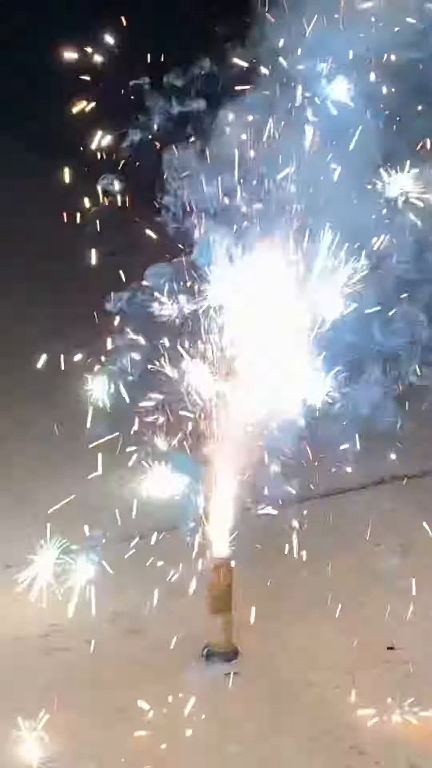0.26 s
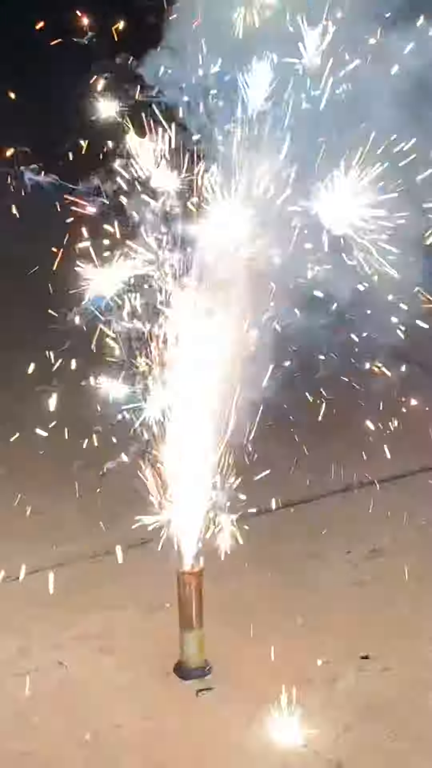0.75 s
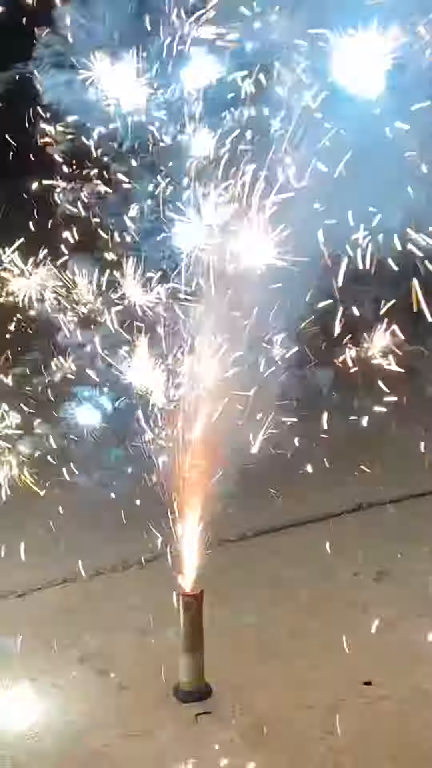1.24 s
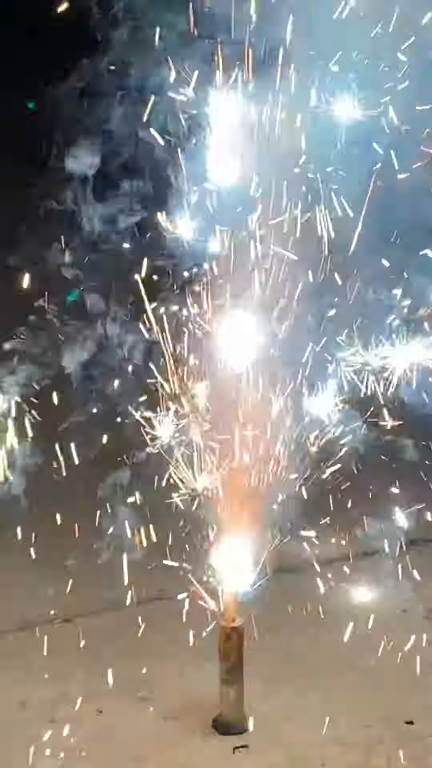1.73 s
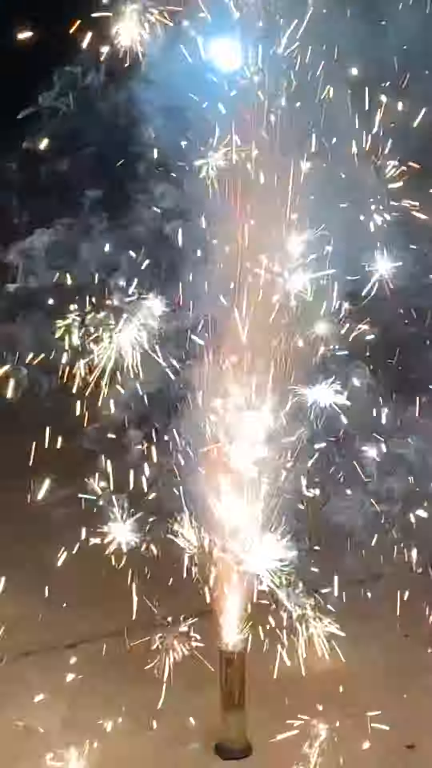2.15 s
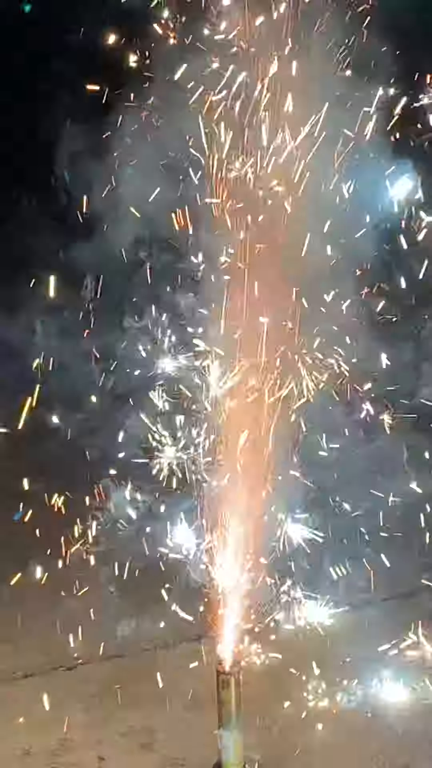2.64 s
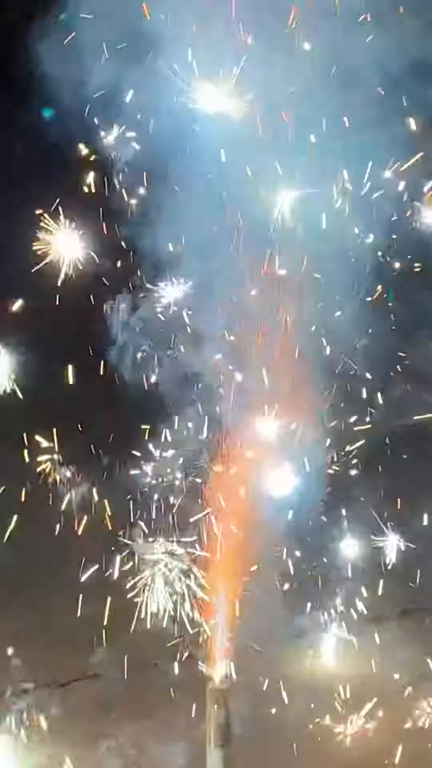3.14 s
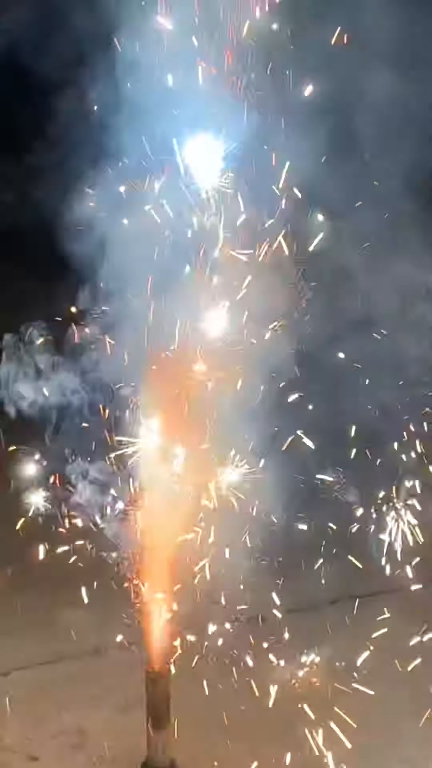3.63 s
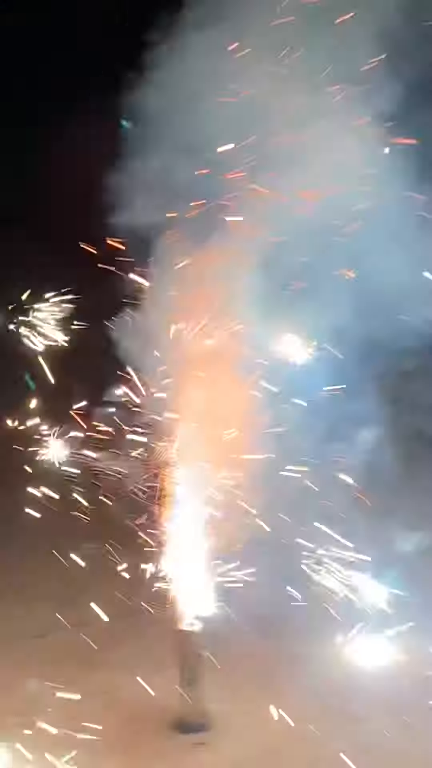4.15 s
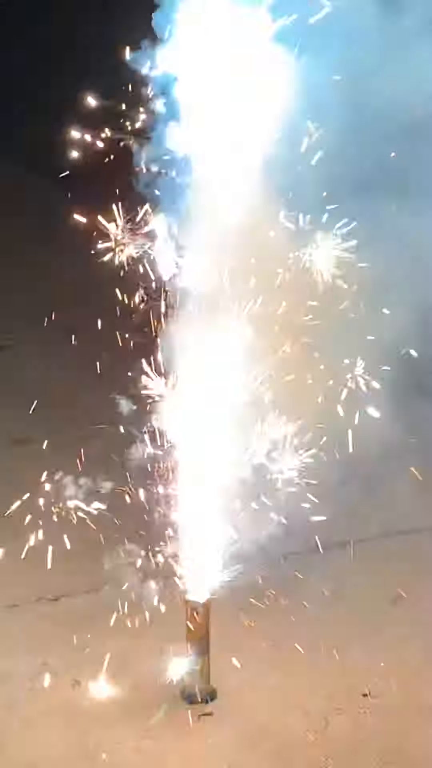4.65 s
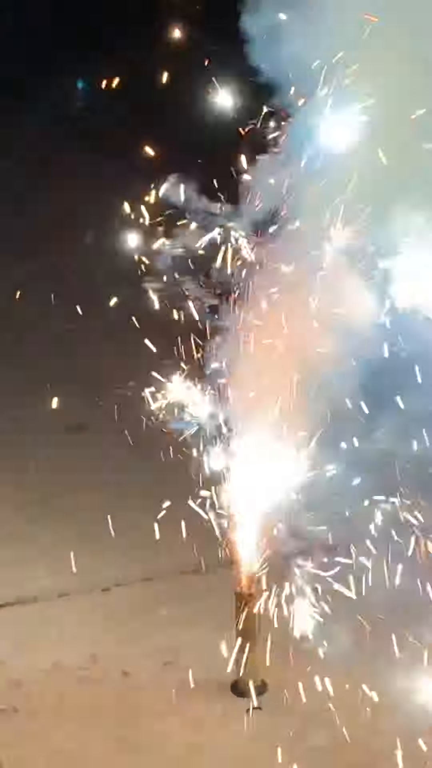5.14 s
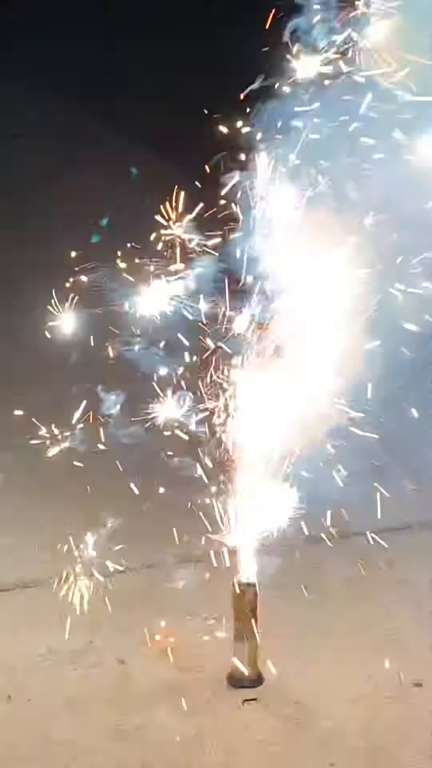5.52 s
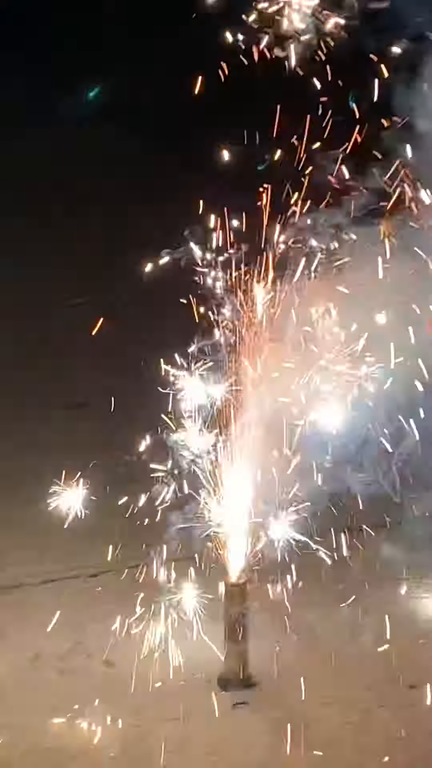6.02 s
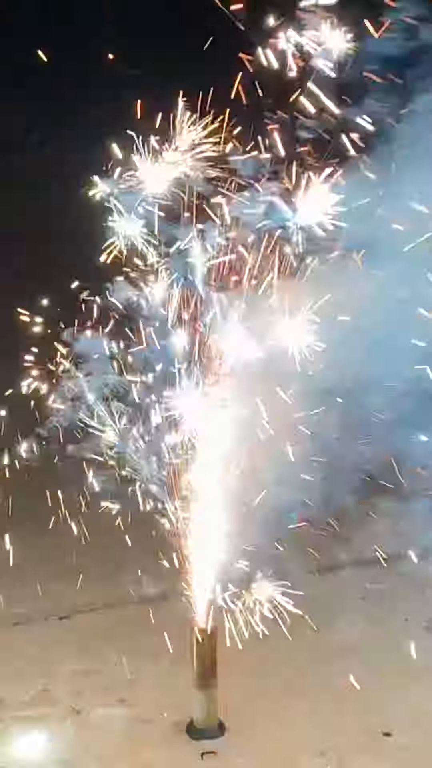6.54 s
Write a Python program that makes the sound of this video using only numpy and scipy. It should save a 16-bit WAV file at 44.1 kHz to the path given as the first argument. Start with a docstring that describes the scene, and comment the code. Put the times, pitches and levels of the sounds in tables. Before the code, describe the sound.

A fountain firework is already burning at 0 s, close by on concrete outdoors: an airy, rough roar with bright steady hiss and dense fine crackle, slightly hollow from its tube. The roar wavers, dips around 0.9 s, then swells fullest from about 1.1 to 1.9 s, with two quick spurts near 1.8. It sinks after 2.1 s and by 2.9-3.15 is mostly thin sizzle, the bass now more centred. Soft dull puffs come near 3.2 s as the roar jumps back, followed by ragged gushes around 3.5-4 and sharp dry cracks at 3.5, 3.9, 4.3, 4.5 and 4.8. The hollow tone rises in pitch around 4-4.8 s. A lull near 4.9-5.1 s gives way to uneven surges, bright spurts at 5.4 and 5.5, and a crack at 5.7. After a short drop near 5.8-6 s, the roar returns strongly, with one more crack at 6.1, and continues to the end, about 6.8 s.

```python
"""A hiss and a roar are heard first, then gushes, crackle, dull puffs and sharp cracks: a fountain firework.
It burns on concrete at night, a few steps from a hand-held pair of microphones. The jet is shaped noise,
its sparks are random clicks, and a delayed low-passed copy is the ground echo. Below 8 kHz the sound
sinks and swells on a course of its own, apart from the treble. Early on the bass is wide, later centred."""
import sys
import numpy as np
from scipy import signal
from scipy.fft import rfft, irfft
from scipy.io import wavfile
from scipy.ndimage import uniform_filter1d

SR = 44100
rng = np.random.default_rng(int(sys.argv[2]) if len(sys.argv) > 2 else 0)


def master(y):
    """Save y as 16-bit WAV."""
    cut = np.clip(np.atleast_2d(y).T, -1, 1)
    pcm = np.round(cut * 32767)  # scale
    wavfile.write(sys.argv[1], SR, pcm.astype(np.int16))


N = 298998
TIME_S = np.arange(N) / SR
HZ = np.maximum(np.arange(N // 2 + 1) * SR / N, 1)   # spectral lines

# hollow note of the tube in the roar: [t/s, f/Hz, level/dB over the rumble]
HOLLOW_NOTE = [(0, 538.9, -10), (2.2, 531.6, -17.5), (3.201, 563.7, -17.5), (3.999, 683.5, -13.5),
               (4.802, 679.6, -11), (5.202, 556, -13.5), (6.78, 552, -9.5)]
# low puffs from the tube: [t/s, level/dB before rise and decay, final f/Hz, 60 dB decay time/s]
PUFFS = [(3.169, -17, 69.4, 0.027), (3.244, -22, 108, .04), (5.805, -26.5, 79.7, 0.053)]
# strength of the roar below 8 kHz, before dips and gushes: [t/s, level/dB]
ROAR_LEVEL = [(0, -38), (.2, -33.5), (.38, -39.5), (.55, -30), (.7, -31), (.74, -34.5), (.83, -39),
              (.915, -40.5), (.93, -34.5), (1.0, -33), (1.06, -32.5), (1.15, -27.5), (1.27, -30),
              (1.33, -29), (1.42, -31), (1.56, -27.5), (1.74, -30.5), (1.85, -27.5), (1.92, -30),
              (1.96, -34), (2.12, -35), (2.28, -43), (2.55, -42), (2.7, -46.5), (2.88, -48.5), (2.95, -45),
              (3.02, -39.5), (3.08, -47.5), (3.15, -55.5), (3.175, -49), (3.19, -43.5), (3.225, -39),
              (3.24, -35.5), (3.36, -32), (3.53, -41), (3.58, -43), (3.7, -35), (3.85, -36.5),
              (4.05, -37.5), (4.15, -33.5), (4.62, -33), (4.72, -38.5), (4.8, -42), (4.89, -47),
              (4.97, -49), (5.02, -46), (5.1, -44), (5.19, -32.5), (5.34, -37), (5.42, -32), (5.63, -37),
              (5.78, -34), (5.81, -44), (5.9, -43), (5.97, -39.5), (6.02, -38.5), (6.05, -29.5),
              (6.25, -31.5), (6.5, -28.5), (6.68, -33), (6.78, -29)]
# colour of the burn: [t/s, treble level/dB, rumble over roar/dB, upper body over lower/dB,
# upper rumble over deep/dB]
BURN_TONE = [(0, -29.5, -4, -4.5, 1), (.4, -32, -7.5, -2, 0.5), (.85, -29.5, -6.5, -4.5, 1),
             (1.4, -30, -5.5, 3, 4), (1.9, -30.5, -8, -1, 0), (2.3, -29, -6, -3.5, 1),
             (2.6, -29.5, -7.5, -2.5, 6), (2.85, -30, -4.5, -8, 6), (3.0, -31, -5, -1, -2),
             (3.15, -30.5, -3, -4, 6), (3.25, -34.5, -6.5, 3, 5), (3.4, -33.5, -5, -3, 0),
             (3.85, -34.5, -2, 4.5, 0.5), (4.3, -36.5, -3.5, -5, -3), (4.65, -33.5, -4, -2, -1.5),
             (5.0, -33, -4, -8.5, 3), (5.25, -32, -6.5, -5.5, -0.5), (5.6, -31, -3.5, 2, 2),
             (6.05, -30, -6, -4, -1), (6.78, -30, -7.5, -4, 1)]
# short dips in the roar and hiss: [t/s of deepest point, depth/dB, fall/ms, return/ms, treble share/0-1]
LEVEL_DIPS = [(.075, -6, 36, 160, 0), (1.775, -1.5, 38, 18, 0.6), (2.86, -6, 130, 26, 0),
              (3.07, -5.5, 12, 15, 1), (3.615, -7, 26, 34, 0.6), (3.685, -2.5, 26, 20, 1),
              (3.771, -8.5, 50, 8.2, 0.7), (3.946, -13.5, 56, 40, 0.3), (4.09, -5.5, 23, 8.1, 1),
              (5.818, -4, 15, 36, 0), (5.955, -5, 40, 32, 0.1)]
# gushes of sparks: [t/s, level/dB before rise and decay]
SPARK_GUSHES = [(.5636, -33), (.684, -26), (.975, -25), (1.095, -26), (1.3309, -35), (1.5374, -38),
                (1.7923, -16), (1.8452, -14), (2.18, -17), (2.681, -26), (2.84, -20), (3.16, -22),
                (3.253, -20), (3.28, -24), (3.3368, -32), (3.535, -21), (3.5648, -11), (3.65, -15),
                (3.6965, -19), (3.716, -17), (3.775, -33), (3.797, -12), (3.973, -13), (4.013, -18),
                (4.188, -33), (4.301, -25), (4.373, -18), (4.5805, -27), (4.6528, -25), (4.7561, -20),
                (4.788, -21), (4.9636, -21), (5.043, -15), (5.1512, -32), (5.251, -22), (5.282, -24),
                (5.3677, -13), (5.443, -23), (5.545, -12), (5.708, -19), (6.036, -31), (6.1814, -22)]
# single large sparks that burst close by: [t/s, level/dB before doubling and high-pass]
NEAR_CRACKS = [(3.5449, -17), (3.8987, -19), (4.3296, -14), (4.4985, -14), (4.5466, -16), (4.7908, -18),
               (5.6842, -11), (6.139, -14)]
# spectral colour of jet and sparks, before each band is scaled: [f/Hz, level/dB per Hz]
JET_COLOUR = [(60, -1), (130, -2), (170, -3), (290, -1), (360, -7.5), (460, -11.5), (620, -3.5), (780, 0),
              (940, -2.5), (1100, 0), (1750, -0.5), (2050, -6), (2450, -7.5), (2950, -4), (3600, -2),
              (4400, -2.5), (7800, -3.5), (8100, -2.5), (8800, -2.5), (10500, -5), (12000, -6), (13700, -8),
              (16000, -8)]
# likeness of the two microphone ports: [f/Hz, likeness/0-1]
PORT_LIKENESS = [(700, 0.94), (1100, 0.8), (1500, 0.95), (2000, 0.85), (2450, 0.35), (2800, 0.72),
                 (3500, 0.86), (4300, 1)]
# gain of the right port: [f/Hz, level/dB]
RIGHT_PORT_GAIN = [(500, 0), (800, 6), (1100, 2), (1400, 0.5), (1750, 1.5), (2050, 5.5), (2500, 1),
                   (2900, 0)]
# phase lag between the ports: [f/Hz, lag/rad]
PORT_LAG = [(1100, 0), (1600, .2), (2200, 1.5), (3000, 1.0), (3600, 1.45), (4700, 3.14), (6900, 6.28),
            (15250, 18.85)]
# hiss that arrives from the right: [f/Hz, level/dB against the direct sound]
FAR_SIDE_LEVEL = [(2500, -24), (3500, -23.5), (5600, -9), (10000, -10), (14000, -10)]

GROUND_ECHO_MS, GROUND_ECHO_DB, GROUND_CUT_HZ = 0.55, -3, 2000
RUMBLE_TOP_HZ, BODY_TOP_HZ = 835, 8000
GUSH_UNIT_DB, GUSH_T60_MS, GUSH_ATTACK_MS = -15, 53, 1.8   # a level of -15 dB adds one to the gain
SNAPS_PER_S, SNAP_DB, SNAP_SPREAD_DB, SNAP_T60_MS = 40, -12, 2, 30   # least snap against the steady part
CRACK_CUT_HZ = 4200
SPARKS_PER_S, SPARK_SPREAD_DB = 1800, 3   # median rate; mean excess over the least spark, before capping
SPARK_DB = -4.5   # against the jet noise
SPARK_PULL_SHARE = 0.3   # share of sparks that begin with a pull instead of a push
WIDE_BASS_MS, WIDE_BASS_LEAD_RAD, WIDE_BASS_TOP_HZ = 2.226, 1, 1035   # lag and lead of the right bass
CENTRED_FROM_S, CENTRED_BY_S, CENTRED_TOP_HZ = 2.64, 2.68, 750
OVERLOAD = 1   # amplitude that rounded peaks approach
LOW_CUT_HZ, CUTOFF_HZ = 45.3, 15730


def from_db(db):
    """Decibel law: the amplitude ratio of a level in dB."""
    return 10 ** (np.asarray(db) / 20)


def rms_one(x):
    """Normalisation: the signal at unit root mean square."""
    return x / np.sqrt(np.mean(x ** 2) + 1e-20)


def at_hz(points, axis=np.log):
    """Interpolation: a table over f/Hz read at every spectral line."""
    hz, value = np.transpose(points)
    return np.interp(axis(HZ), axis(hz), value)


def filtered(x, response):
    """Linear filtering: the spectrum multiplied by a frequency response."""
    return irfft(rfft(x) * response, N)


def below(hz, order):
    """Complementary crossover: a low-pass weight; one minus it is the matching high-pass."""
    return 1 / (1 + (HZ / hz) ** order)


def drift(corner_hz):
    """Random fluctuation: noise through two equal one-pole low-passes, at unit rms."""
    pole = np.exp(-2 * np.pi * corner_hz / SR)
    run_in = 20000
    noise = rng.standard_normal(N + run_in)
    return rms_one(signal.lfilter([1], [1, -2 * pole, pole * pole], noise)[run_in:])


def patchy(x, band, splits_hz, flicker_db, corner_hz, shared_db, tilt_db=0):
    """Band-wise modulation: parts of a unit-rms band flicker partly together, partly on their own."""
    edges = [0] + [below(hz, order=8) for hz in splits_hz] + [1]
    slopes = np.linspace(-.5, .5, len(edges) - 1)
    total = 0
    for low, high, slope in zip(edges, edges[1:], slopes):
        part = filtered(x, band * (high - low))
        level_db = shared_db + flicker_db * drift(corner_hz) + slope * tilt_db
        total = total + part * from_db(level_db)
    return rms_one(total)


def hollow_note():
    """Tube resonance: slow noise on two quadrature carriers makes a narrow band about a wavering pitch."""
    s, hz, level_db = np.transpose(HOLLOW_NOTE)
    phase = 2 * np.pi * np.cumsum(np.interp(TIME_S, s, hz)) / SR
    band = drift(32) * np.cos(phase) + drift(28) * np.sin(phase)
    return from_db(np.interp(TIME_S, s, level_db)) * band


def thumps():
    """Transient puff of gas: a low wave that falls in pitch and dies exponentially."""
    out = np.zeros(N)
    for s, level_db, hz, t60_s in PUFFS:
        age = np.maximum(TIME_S - s, 0)
        turns = hz * (age + 0.0148 * (1 - np.exp(-age / 0.0017)))   # pitch settles with a 1.7 ms constant
        rise = np.minimum(age / 0.0066, 1)
        out += from_db(level_db - 60 * age / t60_s) * rise * np.sin(2 * np.pi * turns)
    return out


def level_dips():
    """Level dips: short losses in dB of roar and treble, each with its own fall and return."""
    dips_db = np.zeros((2, N))
    for s, depth_db, fall_ms, return_ms, share in LEVEL_DIPS:
        corners_s = [s - fall_ms / 1000, s, s + return_ms / 1000]
        dips_db += np.interp(TIME_S, corners_s, [0, depth_db, 0]) * np.array([[1], [share]])
    return dips_db


def gushes():
    """Intermittent ejection: the gain jumps as a clot of sparks leaves the tube, then dies away."""
    gain = np.ones(N)
    for s, level_db in SPARK_GUSHES:
        age_ms = np.maximum(TIME_S - s, 0) * 1000
        rise = np.minimum(age_ms / GUSH_ATTACK_MS, 1)
        decay = from_db(level_db - GUSH_UNIT_DB - 60 * age_ms / GUSH_T60_MS)
        gain += (TIME_S > s) * decay * rise
    return gain


def snaps():
    """Shot noise as a treble gain: small clusters burst in the air at random and die quickly."""
    sizes = from_db(SNAP_DB + SNAP_SPREAD_DB * np.minimum(rng.exponential(1, N), 4))
    bursts = sizes * (rng.random(N) < SNAPS_PER_S / SR)
    decay = from_db(-60 * 1000 / SNAP_T60_MS / SR)   # per sample
    return rms_one(1 + signal.lfilter([1], [1, -decay], bursts + 1e-18))


def cracks():
    """Impulse radiation: a sharp push with its rebound, high-passed so that it has no bass."""
    s, level_db = np.transpose(NEAR_CRACKS)
    clicks = np.zeros(N)
    clicks[(s * SR).astype(int)] = from_db(level_db)
    high_pass = signal.butter(2, CRACK_CUT_HZ, "high", fs=SR, output="sos")
    return signal.sosfilt(high_pass, 2 * clicks + 1e-18)


def sparks():
    """Clustered shot noise: each spark is a single jolt of air; few are large, and they come in clumps."""
    sizes = from_db(SPARK_SPREAD_DB * np.minimum(rng.exponential(1, N), 4))
    signs = np.where(rng.random(N) < SPARK_PULL_SHARE, -1, 1)
    chance = SPARKS_PER_S * from_db(4 * drift(40)) / SR
    clicks = sizes * signs * (rng.random(N) < chance)
    return rms_one(clicks - uniform_filter1d(clicks, size=21))   # the air around swings back by as much


def fountain():
    """Jet noise with ground reflection, as direct, scattered and far-side sound in three level-driven bands."""
    dip_db, treble_dip_db = level_dips()
    s, *tone = np.transpose(BURN_TONE)
    treble_db, rumble_db, tilt_db, rumble_tilt_db = (np.interp(TIME_S, s, db) for db in tone)
    body_gain = from_db(np.interp(TIME_S, *np.transpose(ROAR_LEVEL)) + dip_db)
    rumble_gain = body_gain * from_db(rumble_db)
    treble_gain = from_db(treble_db + treble_dip_db)

    delay = np.exp(-2j * np.pi * HZ * GROUND_ECHO_MS / 1000)
    echo = from_db(GROUND_ECHO_DB) * below(GROUND_CUT_HZ, order=2) * delay
    colour = from_db(at_hz(JET_COLOUR)) * (1 + echo)
    low, up_to_body = below(RUMBLE_TOP_HZ, order=4), below(BODY_TOP_HZ, order=160)

    direct = rng.standard_normal(N) + from_db(SPARK_DB) * sparks()
    indirect = rng.standard_normal((2, N)) * np.hypot(1, from_db(SPARK_DB))   # noise of equal power
    paths = np.vstack([direct, indirect])
    direct_only = np.array([[1], [0], [0]])
    flicker = drift(48)

    rumble = patchy(paths, colour * low, [250], 1.0, 27.0, 0.52 * flicker, rumble_tilt_db)
    rumble = rumble + hollow_note() * direct_only
    body_splits_hz = [1170, 1540, 2200, 2950, 3730, 4870, 6340]
    body = patchy(paths, colour * (up_to_body - low), body_splits_hz, 2.34, 19.0, 0.41 * flicker, tilt_db)
    treble = patchy(paths, colour * (1 - up_to_body), [9500, 11000, 13000], 1.5, 60.0, 0.7 * flicker)
    hiss = gushes() * (body_gain * body + treble_gain * snaps() * treble)
    return rumble_gain * rumble + hiss + cracks() * direct_only


def microphones(direct, scattered, far_side):
    """Arrival differences: the right port hears the fountain later, the left port the far side;
    sound scattered by the hand enters the ports with opposite sign and makes them differ."""
    alike = np.clip(at_hz(PORT_LIKENESS), 0, 1)
    common = filtered(direct, np.sqrt((1 + alike) / 2))
    opposed = filtered(scattered, np.sqrt((1 - alike) / 2))
    left, right = common + opposed, common - opposed
    lag = np.exp(-1j * at_hz(PORT_LAG, axis=np.asarray))
    right = filtered(right, from_db(at_hz(RIGHT_PORT_GAIN)) * lag)
    far_side = filtered(far_side, from_db(at_hz(FAR_SIDE_LEVEL)))
    left, right = left + filtered(far_side, lag), right + far_side

    # two whole turns bring the phase near zero at the top of the bass
    bass_phase = WIDE_BASS_LEAD_RAD - 2 * np.pi * HZ * WIDE_BASS_MS / 1000 + 4 * np.pi
    wide = filtered(right, np.exp(1j * below(WIDE_BASS_TOP_HZ, order=12) * bass_phase))
    centred = right + filtered(left - right, below(CENTRED_TOP_HZ, order=16))   # bass of the left port
    share = np.interp(TIME_S, [CENTRED_FROM_S, CENTRED_BY_S], [0, 1])
    return np.array([left, (1 - share) * wide + share * centred])


def scene():
    """Superposition: the fountain at both microphones, with its puffs in the middle."""
    return microphones(*fountain()) + thumps()


def record(dry):
    """Saturation and band limiting: peaks are rounded; the deepest bass and the top are cut."""
    rounded = OVERLOAD * np.tanh(dry / OVERLOAD)
    high_pass = signal.butter(6, LOW_CUT_HZ, "high", fs=SR, output="sos")
    low_pass = signal.ellip(14, .5, 75, CUTOFF_HZ, fs=SR, output="sos")
    return signal.sosfilt(low_pass, signal.sosfilt(high_pass, rounded))


dry = scene()
out = record(dry)
master(out)
```